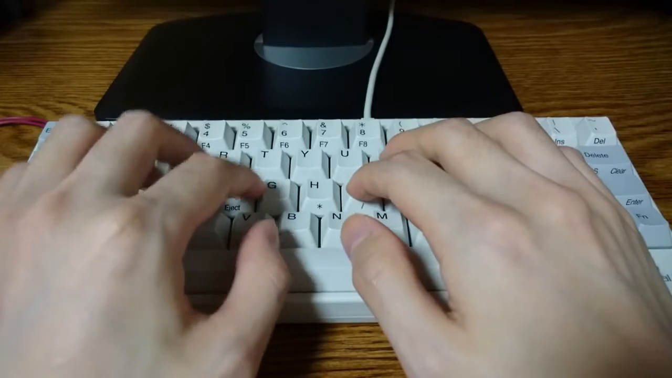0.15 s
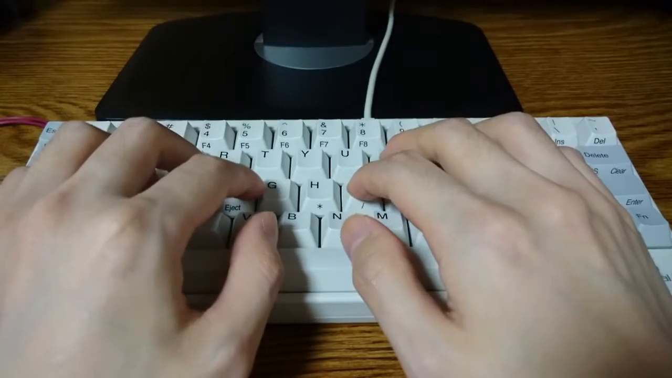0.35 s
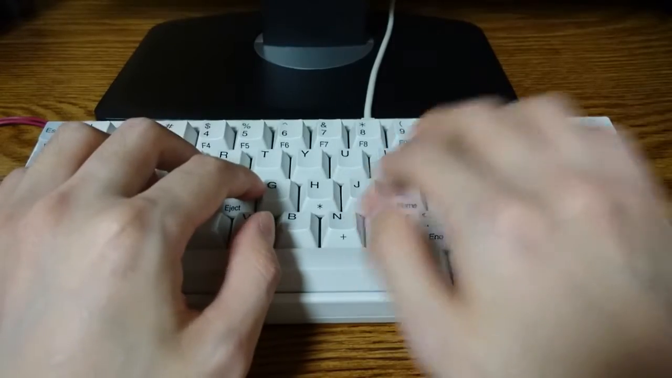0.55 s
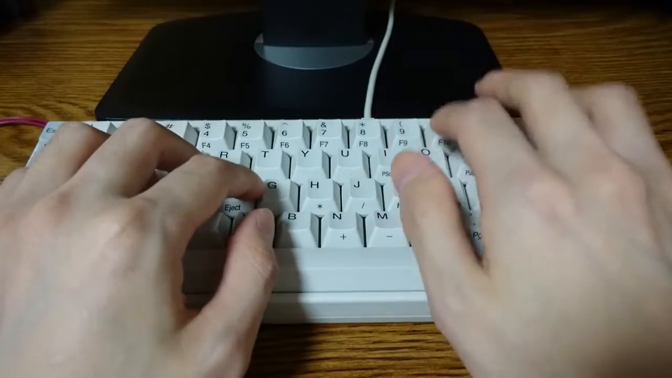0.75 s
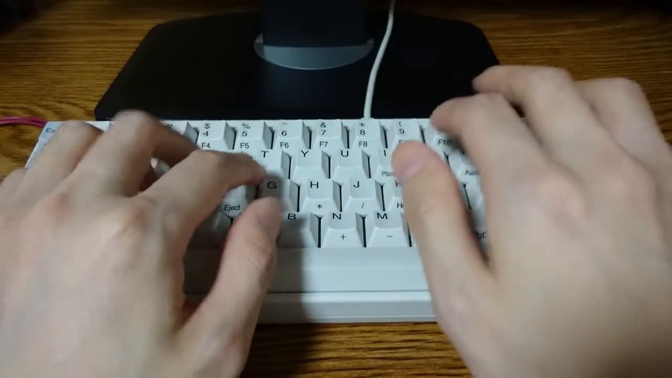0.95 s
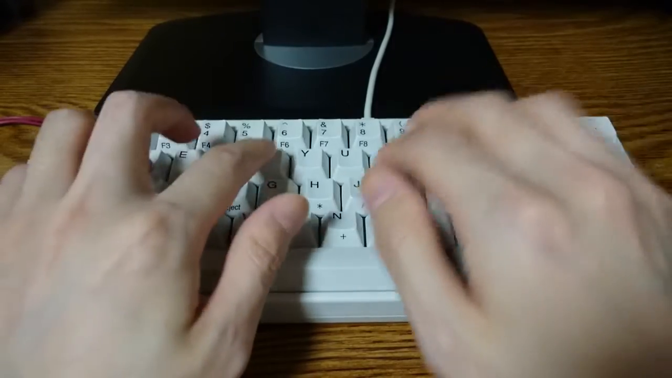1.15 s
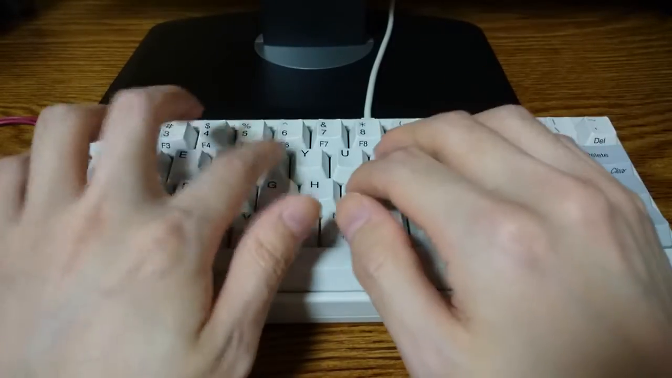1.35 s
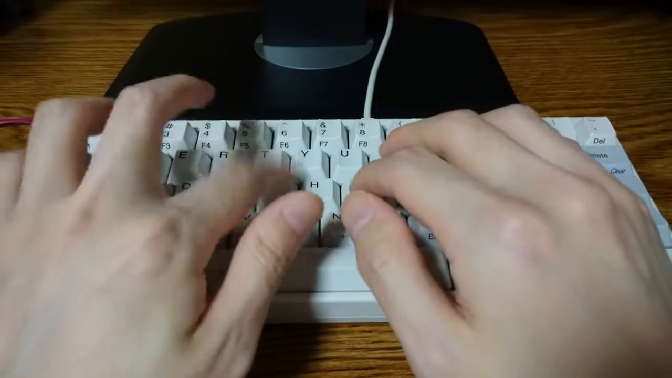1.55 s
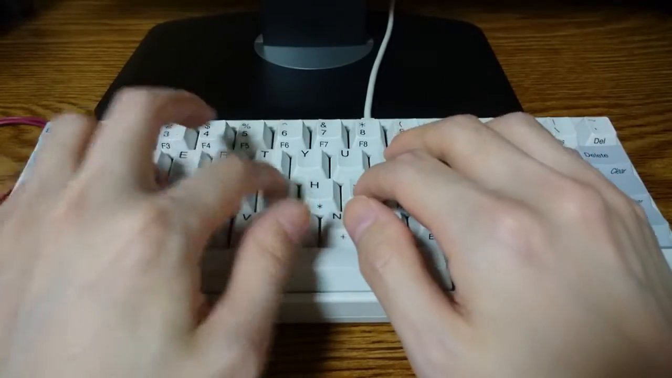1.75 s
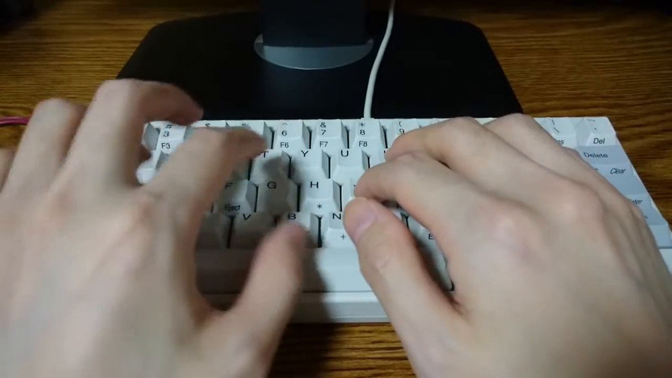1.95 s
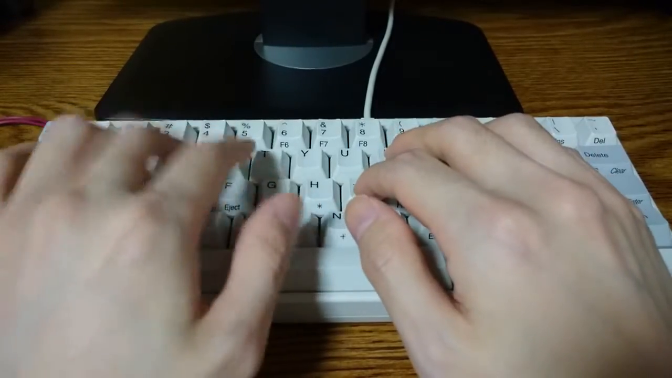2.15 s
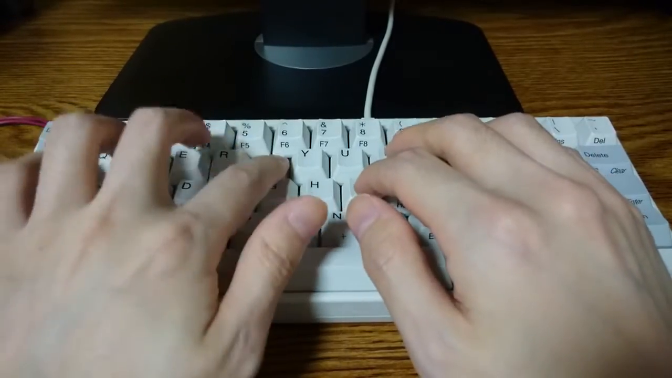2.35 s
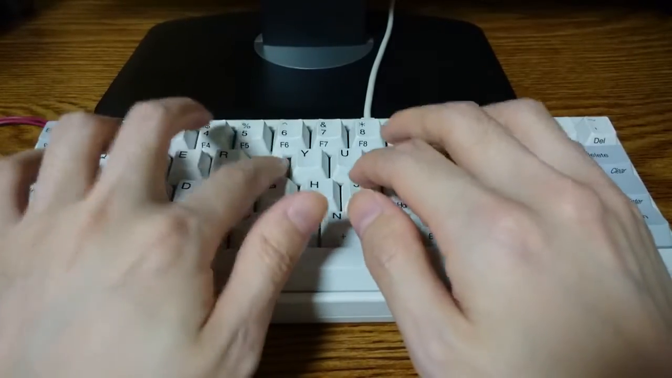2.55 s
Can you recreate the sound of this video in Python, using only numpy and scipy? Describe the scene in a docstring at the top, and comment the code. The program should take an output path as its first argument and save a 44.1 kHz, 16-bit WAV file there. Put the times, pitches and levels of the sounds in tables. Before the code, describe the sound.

Typing on a mechanical keyboard, heard up close in a quiet room: a brief clatter of keys, a few softer presses, a pause, then a quick burst. Each stroke clicks and knocks lightly through the wooden desk.

```python
"""Bursts of fast typing on a mechanical keyboard, close by, on a wooden desk in a quiet room.
Each key that lands or springs back knocks the desk, the case and the switch plate, rings its cap and
clicks. Loose caps tick in between, fingertips brush over them and the springs of large keys ping.
The room adds a short dull tail and a steady hush."""
import sys
import numpy as np
from scipy import signal
from scipy.fft import rfft, irfft
from scipy.io import wavfile

SR = 44100
rng = np.random.default_rng(int(sys.argv[2]) if len(sys.argv) > 2 else 0)


def wrap_up_sound(samples):
    """Save the sound to the file named by the first command line argument, as 16-bit audio."""
    columns = np.atleast_2d(samples).T
    # keep every value between -1 and 1, then stretch to whole-number steps
    tamed = np.clip(columns, -1, 1)
    steps = np.round(tamed * 32767).astype(np.int16)
    wavfile.write(sys.argv[1], SR, steps)


N = 119070
T = np.arange(8192) / SR  # time axis of one short sound
HZ = np.fft.rfftfreq(len(T), 1 / SR)
LEAD_S, REFERENCE_S = .02, .01  # run-up to a contact; time over which a hit's level is reckoned
KEY_DETUNE = .02  # every key sits elsewhere on the board

# Bands of plate, cap, click and snap. Each row: low edge in Hz, high edge in Hz.
PLASTIC_BANDS = [(680, 2545), (2450, 3700), (3700, 7070), (7600, 14350)]
# Modes of the case. Each row: pitch in Hz, relative level in dB, T60 in seconds.
CASE_MODES = [(200, -11, 0.12), (249, -3, 0.056), (301, -1.5, .09), (355.4, -1.5, .045), (455.2, 2, 0.067),
              (532.8, -4, 0.092), (612, -6, 0.037)]


def keystrokes(resonance):
    """Each stroke shakes desk, case and plastic; resonance scales the plastic's peaks."""
    # Keys landing or springing back. Each row: start in seconds, rattle decay in seconds, levels in dB
    # of desk, case, plate, cap, click and snap, then the favoured Hz of case, plate, cap and click.
    strokes = [(0.0376, 0.00092, -46.5, -51.5, -55.5, -43.5, -50.5, -66.5, 267, 1130, 3180, 3700),
               (0.0626, 0.0061, -55, -32, -40, -30, -35, -47.5, 452, 740, 3130, 3750),
               (0.066, 0.00083, -40, -40.5, -40, -29.5, -40.5, -40.5, 450, 1930, 2960, 3430),
               (0.153, 0.0039, -52, -49, -54.5, -42.5, -59, -76, 514, 2300, 3160, 5700),
               (0.7506, 0.0016, -51, -58.5, -58, -95, -49, -84, 202, 1320, 3570, 4600),
               (0.7746, 0.0013, -50, -40.5, -52.5, -79, -66, -62, 300, 1060, 3460, 4670),
               (0.84, 0.011, -51.5, -51, -48.5, -57, -48.5, -82, 282, 1540, 2520, 4860),
               (0.925, 0.0018, -47.5, -45, -55, -89, -48.5, -70, 290, 1140, 2520, 4670),
               (0.9967, 0.0098, -53, -47.5, -55, -55.5, -48, -82, 290, 940, 3590, 3570),
               (1.6682, 0.0025, -59, -62.5, -47, -50, -48, -82, 610, 2120, 3380, 4450),
               (1.6971, 0.0031, -51.5, -44, -40, -50.5, -42, -80, 477, 1180, 2620, 5100),
               (1.7712, 0.0017, -45.5, -49.5, -37.5, -41.5, -37, -56, 422, 2070, 3240, 5680),
               (1.7876, 0.0012, -49, -36.5, -31.5, -35.5, -37, -52, 260, 1275, 3180, 5180),
               (1.838, 0.0059, -56.5, -51, -37.5, -33, -36.5, -63.5, 456, 2110, 2570, 3900),
               (1.9318, 0.0045, -41.5, -35.5, -35.5, -30.5, -35, -41, 428, 2250, 3190, 3960),
               (1.962, 0.0057, -54, -51.5, -37, -42.5, -43.5, -64, 280, 1970, 3530, 6330),
               (2.04, 0.0032, -51, -48.5, -77, -42, -56.5, -86, 517, 2300, 2980, 5750),
               (2.1045, 0.0025, -50, -52, -46.5, -46, -37, -63.5, 280, 2050, 2700, 3770),
               (2.1287, 0.0033, -44.5, -39, -44.5, -49, -44.5, -69, 557, 735, 2860, 5040),
               (2.2306, 0.0025, -47, -48, -42, -43, -34, -53.5, 300, 1110, 3700, 4730),
               (2.2529, 0.0046, -46.5, -47.5, -53, -63, -48, -60, 606, 1960, 3700, 3730),
               (2.2641, 0.00097, -39, -39.5, -35.5, -45, -37.5, -58.5, 407, 2010, 3120, 4230),
               (2.3478, 0.009, -57, -49.5, -41, -46, -41.5, -60, 540, 704, 3680, 5400),
               (2.42, 0.0024, -52, -57, -44.5, -39.5, -45, -75, 560, 2130, 3050, 5050),
               (2.44, 0.0022, -53.5, -51, -40, -39.5, -42.5, -62, 417, 1740, 3110, 5130),
               (2.563, 0.003, -60.5, -66, -65, -61.5, -72.5, -90, 494, 720, 2920, 5570)]
    # Modes of the desk. Each row: pitch in Hz, relative level in dB, T60 in seconds.
    desk_modes = [(78, -5.5, .07), (99.3, -2, 0.077), (126, -2.5, 0.055), (176.7, -9.5, 0.079)]
    bass_delay_s, early_s = .0005, .0005  # small shifts in seconds that keep the plastic's click and the low thud together
    out = np.zeros(N)
    for start, decay, desk_db, case_db, *plastic_db, case_hz, plate_hz, cap_hz, click_hz in strokes:
        case_modes = [(hz, db + 8 * peak(hz, case_hz, width=90), t60) for hz, db, t60 in CASE_MODES]
        thud = at_level(knock(desk_modes), desk_db) + at_level(knock(case_modes), case_db)
        add(out, start + bass_delay_s, thud)
        contact = chatter(decay, (plate_hz, cap_hz, click_hz), resonance)
        add(out, start - LEAD_S - early_s, balance_bands(contact, plastic_db))
    return out


def knock(modes, push_s=.001, spread_db=3):
    """A soft push sets low modes ringing, in shares that vary from key to key."""
    chance = rng.uniform(-1, 1, size=(len(modes), 2))
    ring = np.zeros(len(T))
    for k, ((hz, db, t60), (louder, sharper)) in enumerate(zip(modes, chance)):
        envelope = amp(db + spread_db * louder - 60 * T / t60)
        ring += (-1) ** k * envelope * np.sin(2 * np.pi * hz * (1 + KEY_DETUNE * sharper) * T)
    return ring * np.minimum(T / push_s, 1)


def chatter(decay_s, own_hz, resonance=1):
    """The stem slides, lands in tiny collisions and leaves the board buzzing, all through the plastic."""
    rise_s, slide_s, buzz_s, dull_hz = .001, .007, .008, 7460
    t = T - LEAD_S
    since = np.maximum(t, 0)
    rise = np.minimum(since / rise_s, 1) ** 1.3
    hit = rise * np.exp(-np.maximum(t - rise_s, 0) / decay_s)
    slide = (1 - rise) * amp(-26) * np.exp(-abs(t) / slide_s)
    buzz = rise * amp(-13.5) * np.exp(-since / buzz_s)
    force = rng.choice([-1., 1.], (2, len(T)))
    drive = rfft(force[0] * hit) + rfft(force[1] * (slide + buzz)) / (1 + 1j * HZ / dull_hz)
    tuning = 1 + KEY_DETUNE / 2 * rng.uniform(-1, 1)
    return irfft(drive * plastic(tuning, own_hz, resonance))


def plastic(tuning, own_hz=(), resonance=1):
    """Frequency response of plate and caps, slightly retuned and lifted at a key's own resonances."""
    # Resonances of plate and caps. Each row: centre in Hz, width in Hz, height in dB.
    board_peaks = [(770, 100, 5), (1120, 130, 4), (1330, 130, 5), (1860, 100, 5), (2170, 130, 5),
                   (2580, 90, 4), (3010, 170, 9), (3210, 90, 3), (3600, 120, 3), (4400, 200, 3),
                   (4980, 220, 5), (5500, 250, 3), (6450, 140, 5), (8440, 220, 9), (13700, 500, 8)]
    # A key's own plate, cap and click peaks. Each row: width in Hz, height in dB.
    own_peaks = [(300, 11), (220, 8), (380, 9.5)]
    # Overall tone of a plastic contact. Each row: frequency in Hz, gain in dB.
    contact_tone = [(600, 1.5), (1200, 1), (1600, -0.5), (2200, 0.5), (3000, -2.5), (3500, -2.5),
                    (4500, -2), (6000, -4), (7500, -7.5), (10000, -22.5), (12500, -22.5), (15500, -6)]
    board_db = sum(height * peak(HZ, hz * tuning, width) for hz, width, height in board_peaks)
    own_db = sum(height * peak(HZ, hz, width) for hz, (width, height) in zip(own_hz, own_peaks))
    db = curve(contact_tone, HZ) + resonance * (board_db + own_db)
    log_gain = np.log(amp(np.r_[db, db[-2:0:-1]]))
    return np.exp(np.conj(signal.hilbert(log_gain)))[:len(HZ)]  # minimum phase: rings after the hit


def cap_ticks():
    """A loose cap wobbles on its stem: a light contact that hardly reaches the case."""
    # Caps ticking under the fingers. Each row: start in seconds, cap level in dB, click level in dB.
    ticks = [(.0185, -52.5, -58), (0.0562, -47, -77), (0.0805, -63, -76), (.0895, -62, -77),
             (0.097, -47.5, -62), (.106, -48, -59), (0.1109, -48, -51), (0.2678, -61.5, -66),
             (0.271, -62.5, -71.5), (.2825, -67, -69), (0.495, -74, -81.5), (0.7728, -94, -46.5),
             (0.8947, -75, -60.5), (0.9231, -88, -59), (1.0223, -66.5, -65), (1.0404, -67, -79),
             (1.864, -53, -65), (1.910, -39, -46.5), (1.973, -50, -62), (1.979, -46, -58), (2, -49, -60.5),
             (2.028, -48, -58.5), (2.052, -60, -59), (2.0558, -53.5, -56.5), (2.2067, -63, -64),
             (2.3655, -49, -63), (2.4868, -61, -73), (2.678, -53.5, -76), (2.684, -56.5, -75),
             (2.6905, -58.5, -86)]
    # Resonances of a loose cap: plate, cap and click, in Hz.
    loose_cap_hz = (2200, 2980, 5600)
    out = np.zeros(N)
    for start, cap_db, click_db in ticks:
        case_db, plate_db, snap_db = cap_db - 23.5, cap_db - 12.5, click_db - 18
        contact = chatter(decay_s=.0019, own_hz=loose_cap_hz)
        add(out, start, at_level(knock(CASE_MODES), case_db))
        add(out, start - LEAD_S, balance_bands(contact, (plate_db, cap_db, click_db, snap_db)))
    return out


def finger_brushes():
    """Skin slips over the caps in a run of small grains."""
    # Fingertip slides. Each row: start in seconds, length in seconds, level in dB.
    brushes = [(.022, 0.065, -54.5), (0.079, 0.026, -53), (0.263, 0.081, -75), (0.716, 0.15, -64.5),
               (0.852, 0.041, -60), (0.894, 0.029, -59), (1.004, 0.065, -58.5), (1.644, 0.12, -59.5),
               (1.915, 0.02, -38), (1.945, 0.048, -57), (2.236, 0.037, -46.5)]
    # Tone of skin friction. Each row: frequency in Hz, gain in dB.
    friction_tone = [(150, 4.5), (400, 1.5), (1500, -1), (3000, -7.5), (5500, -2.5), (7500, -20.5),
                     (15000, -39.5)]
    out = np.zeros(N)
    for start, length, db in brushes:
        grains = rng.standard_normal(len(T)) * rng.random(len(T)) ** 4
        swell = np.sqrt(np.maximum(np.sin(np.pi * np.minimum(T / length, 1)), 0))
        rub = irfft(rfft(grains * swell) * plastic(tuning=.94) * amp(curve(friction_tone, HZ)))
        add(out, start, at_level(rub, db) * np.sqrt(length / REFERENCE_S))
    return out


def spring_pings(t60=.1):
    """The spring of a large key rings on briefly after the key comes up."""
    # Ringing springs. Each row: start in seconds, pitch in Hz, level in dB.
    pings = [(.841, 4655, -55), (.842, 4830, -54), (.998, 3602, -54)]
    out = np.zeros(N)
    for start, hz, db in pings:
        add(out, start, at_level(np.sin(2 * np.pi * hz * T) * amp(-60 * T / t60), db))
    return out


def room_tail(x, onset_s=.012):
    """Diffuse reflections build up, then each band dies at its own speed."""
    # Decay of the room. Each row: frequency in Hz, T60 in seconds.
    decay_times = [(100, 0.15), (300, 0.56), (1000, .42), (3000, 0.4), (6000, 0.35), (9000, .22),
                   (15000, 0.22)]
    # Reverb send. Each row: frequency in Hz, gain in dB.
    send = [(80, -9.5), (250, -11.5), (480, -14), (1000, -13), (2000, -12.5), (3000, -18.5), (4200, -16),
            (6000, -20), (9000, -13.5), (15000, -16)]
    hz, t, noise = signal.stft(rng.standard_normal(SR // 2), SR, nperseg=256)
    t60 = curve(decay_times, hz)[:, None]
    fade = amp(curve(send, hz)[:, None] - 60 * t / t60)
    equal_energy = np.sqrt(2 * np.log(1000) / (t60 * SR))
    tail = signal.istft(noise * fade * equal_energy, SR, nperseg=256)[1]
    build_up = np.minimum(np.arange(len(tail)) / SR / onset_s, 1) ** 2
    return signal.fftconvolve(x, tail * build_up)[:N]


def room_hush(level_db=-67):
    """Steady low rumble and hiss of the quiet room."""
    # Room tone. Each row: frequency in Hz, relative noise density in dB.
    hush_tone = [(25, -3), (52, -0.5), (100, -7), (200, -12.5), (400, -15), (650, -19), (1100, -18.5),
                 (2000, -21), (3200, -25.5), (5000, -32.5), (8000, -37), (16000, -37)]
    noise = coloured(rng.standard_normal(N), hush_tone)
    return amp(level_db) * noise / np.sqrt(np.mean(noise ** 2))


def amp(db):
    return 10 ** (np.asarray(db) / 20)


def at_level(x, db):
    """Gives a short sound the energy of a level of db held for REFERENCE_S."""
    return amp(db) * x * np.sqrt(REFERENCE_S * SR / (np.sum(x ** 2) + 1e-20))


def peak(hz, centre, width):
    """A resonance peak of height 1."""
    return 1 / (1 + (2 * (hz - centre) / width) ** 2)


def curve(points, hz):
    """Joins (Hz, value) points along a log frequency axis."""
    point_hz, values = np.transpose(points)
    return np.interp(np.log(hz + 1), np.log(point_hz + 1), values)


def coloured(x, points):
    """Equalises a whole track by (Hz, dB) points."""
    return irfft(rfft(x) * amp(curve(points, np.fft.rfftfreq(N, 1 / SR))), N)


def band(x, low, high):
    """Steep causal band-pass for a short sound."""
    p = (low * high - HZ ** 2) / (1j * (HZ + 1e-3) * (high - low))
    return irfft(rfft(x) / np.prod([p - pole for pole in signal.buttap(5)[1]], axis=0))


def balance_bands(contact, levels_db):
    """Mixes the plate, cap, click and snap bands of a contact, each at its own level."""
    return sum(at_level(band(contact, *edges), db) for edges, db in zip(PLASTIC_BANDS, levels_db))


def add(mix, start_s, sound):
    part = mix[max(round(start_s * SR), 0):][:len(sound)]
    part += sound[:len(part)]


def scene():
    """The keyboard sits dead ahead; only near reflections and the room spread it a little."""
    # Stereo width of the near reflections. Each row: frequency in Hz, side gain in dB.
    near_width = [(100, -28), (700, -31), (2500, -38), (4000, -34), (6000, -24), (9000, -20), (14000, -26)]
    # Stereo width of the hush. Each row: frequency in Hz, side gain in dB.
    hush_width = [(30, -19), (150, -13), (1500, -20.5), (5000, -3), (12000, 1.5)]
    scatter_s, room_width = .0015, .079
    small_sounds = cap_ticks() + finger_brushes() + spring_pings()
    direct = keystrokes(resonance=.99) + small_sounds
    room_feed = keystrokes(resonance=.31) + small_sounds
    mid = direct + room_tail(room_feed) + room_hush()
    scatter = rng.standard_normal(len(T)) * np.exp(-T / scatter_s)
    near = signal.fftconvolve(direct, scatter / np.linalg.norm(scatter))[:N]
    side = coloured(near, near_width) + room_width * room_tail(room_feed)
    side += coloured(room_hush(), hush_width)
    return np.array([mid + side, mid - side])


def record(dry):
    """A steep low-pass trims the very top of the treble."""
    low_pass = signal.firwin(511, cutoff=16200, window=("kaiser", 9), fs=SR)
    return signal.oaconvolve(dry, low_pass[None], "same")


dry = scene()
out = record(dry)
wrap_up_sound(out)
```